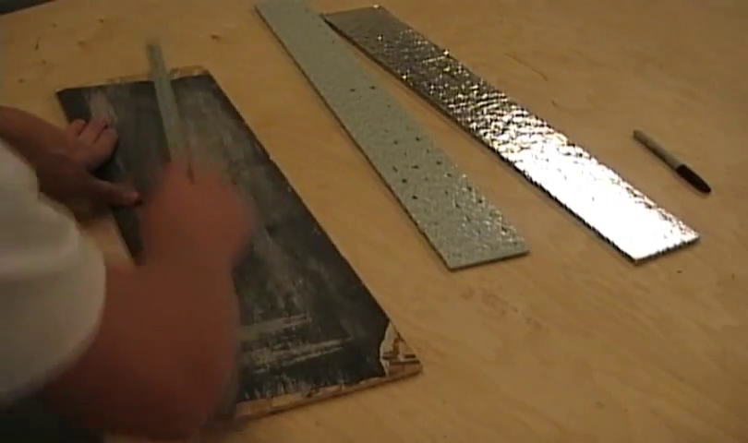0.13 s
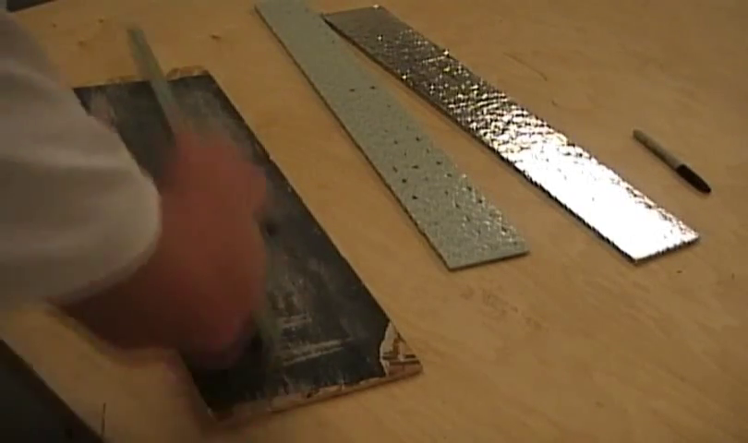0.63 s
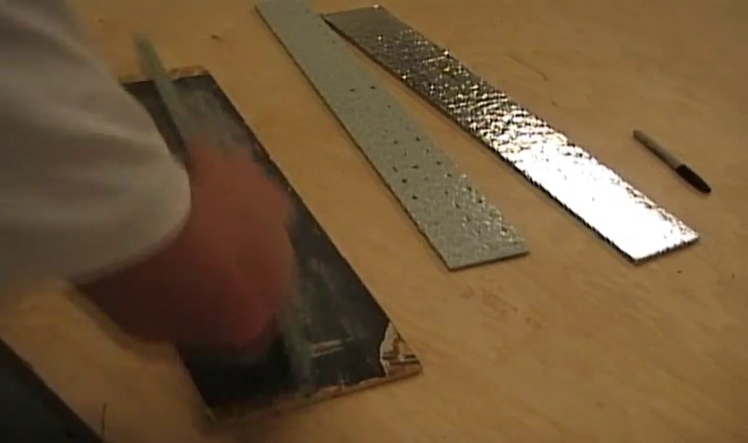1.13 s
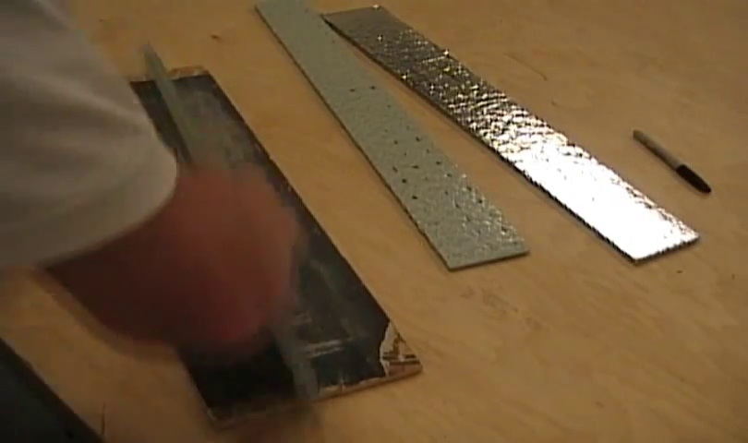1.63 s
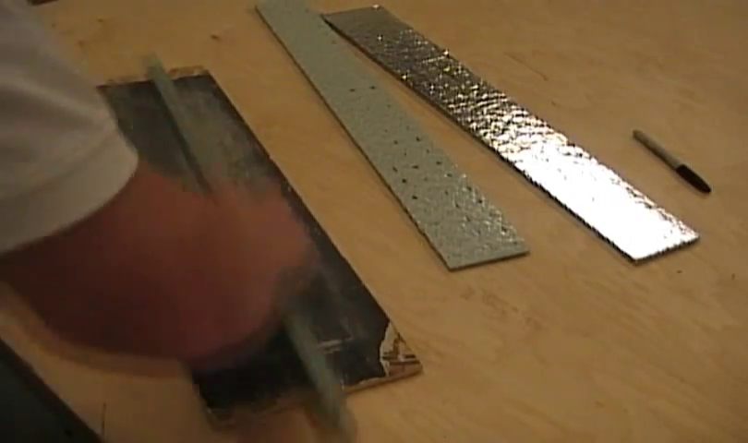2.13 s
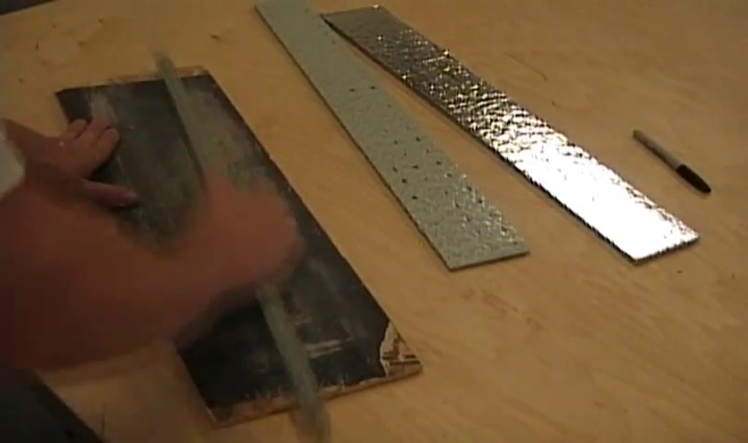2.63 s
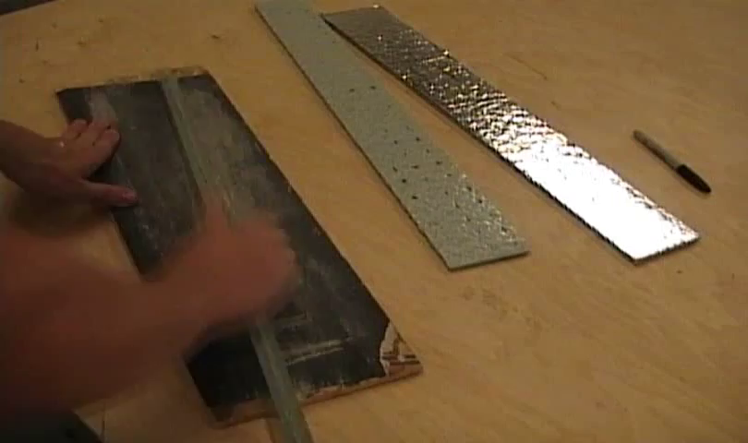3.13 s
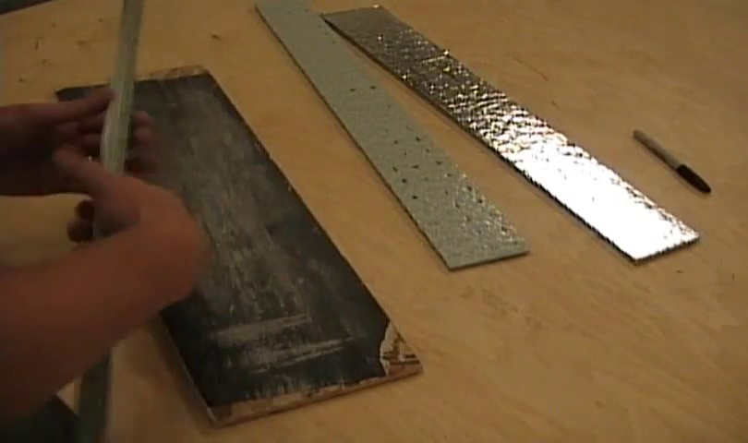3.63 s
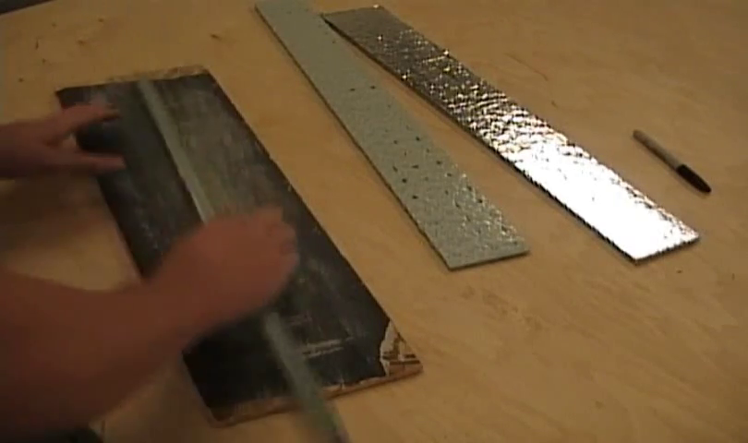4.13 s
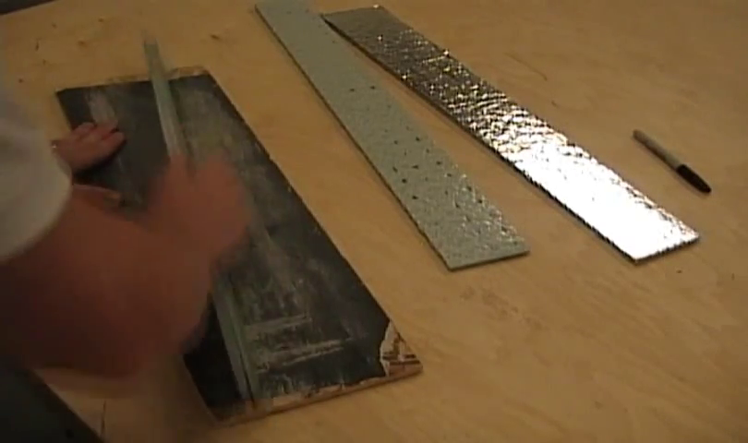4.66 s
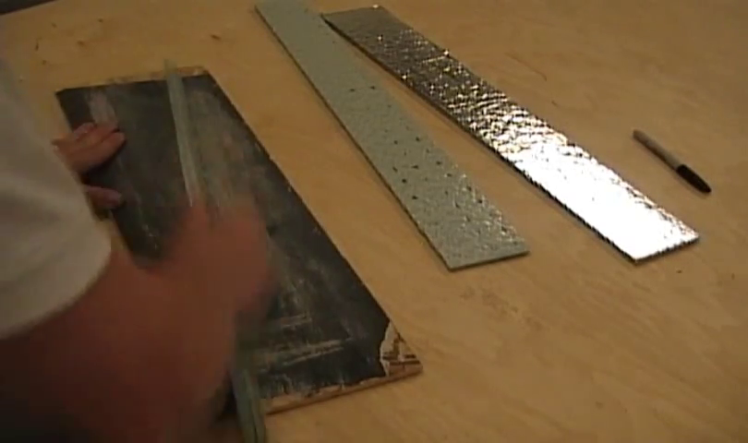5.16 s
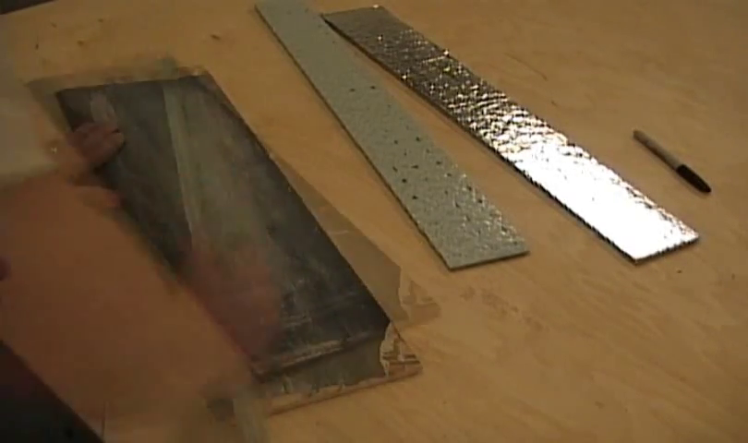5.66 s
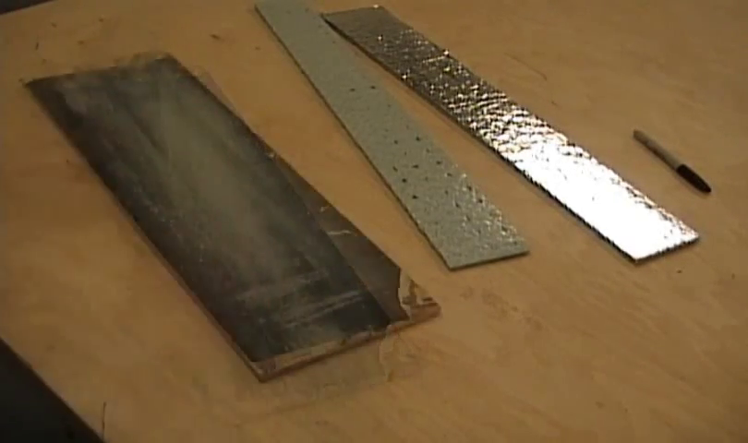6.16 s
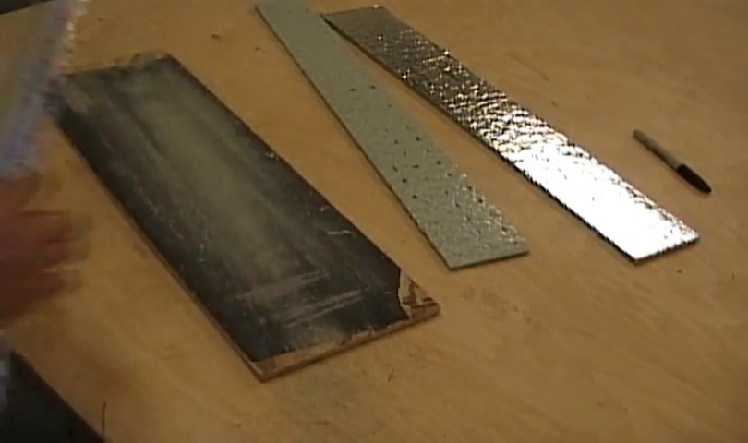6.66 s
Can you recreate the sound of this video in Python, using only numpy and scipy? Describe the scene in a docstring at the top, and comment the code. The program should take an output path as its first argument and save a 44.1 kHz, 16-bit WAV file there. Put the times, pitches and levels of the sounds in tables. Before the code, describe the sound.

A foam strip is rubbed rapidly back and forth on a gritty board in raspy scrapes, pauses with faint scuffs, then rubs again and fades.

```python
"""A hand brushes a foam strip's edge against gritty board, then rubs it to and fro in thirteen strokes.
It stops, turns the strip with faint scuffs, sets it down with a skip and rubs nine strokes more.
Grit tears the foam in dense noise ticks that follow the speed; touches are short decaying bursts.
Room air, hum, fan tones and a whine lie under it all; near the end strokes fade and fan tones come up.
A camcorder rides its gain slowly and notches out the multiples of its tape drum."""
import sys
import numpy as np
from scipy import signal
from scipy.fft import rfft, irfft, next_fast_len
from scipy.io import wavfile
from scipy.ndimage import uniform_filter1d

SR = 44100
rng = np.random.default_rng(int(sys.argv[2]) if len(sys.argv) > 2 else 0)


def bounce(signal):
    """Save signal as a 16-bit WAV file at the path given by the first command-line argument."""
    frames = np.transpose(np.atleast_2d(signal))
    limited = np.clip(frames, -1, 1)
    pcm = np.round(limited * 32767).astype(np.int16)
    wavfile.write(sys.argv[1], SR, pcm)


def to_linear_factor(level_db):
    """Convert decibel levels (scalar or array-like) to linear amplitude factors."""
    exponent = np.asarray(level_db, float) / 20
    return 10 ** exponent


N = 299130
SIZE = next_fast_len(N + SR)  # transform length, with space for the echoes
HZ = np.arange(SIZE // 2 + 1) * SR / SIZE
T = np.arange(N) / SR
BANDS = 250 * 2 ** np.arange(0, 6.1, .5)  # half-octave centres [Hz]

# Spectrum of grit tearing foam: (frequency [Hz], relative density [dB per Hz])
GRIT_SPECTRUM = [(150, -26), (250, -18.5), (440, -12.5), (513, -11), (599, -10), (788, -5), (888, -6),
                 (1410, -2), (2020, -2.5), (4440, 1), (7960, 0.5), (12200, -7.5), (14000, -15),
                 (15000, -18)]


def along(table, hz=HZ):
    """Logarithmic frequency scale: interpolates (Hz, value) points along it."""
    f, value = np.transpose(table)
    return np.interp(np.log(hz + 1), np.log(f), value)


def shape(x, gain):
    """Linear filtering: multiplies the spectrum by a gain for each frequency."""
    return irfft(rfft(x, SIZE) * gain, SIZE)[..., :N]


def level(x, db):
    """Root-mean-square level: scales the signal to it."""
    return x * to_linear_factor(db) / np.sqrt(np.mean(x ** 2))


def walk(rate):
    """Slow random modulation: normal values held 1 / rate seconds and smoothed twice."""
    hold = int(SR / rate)
    held = np.repeat(rng.standard_normal(N // hold + 1), hold)
    return uniform_filter1d(uniform_filter1d(held, hold), hold)[:N]


def band(k):
    """Complementary filter bank: half-octave gains that add up to one, with open ends."""
    place = np.clip(2 * np.log2((HZ + 1) / BANDS[0]), 0, len(BANDS) - 1)
    return np.cos(np.pi / 2 * np.clip(place - k, -1, 1)) ** 2


def resonance(hz, width):
    """Resonance curve: a peak at hz that halves at width / 2 to either side."""
    return 1 / (1 + (2 * (HZ - hz) / width) ** 2)


def ticks(spread_db, size):
    """Impulsive noise: each tick has its own random size, a few well above the rest."""
    tick_db = spread_db * np.minimum(rng.exponential(size=size), 5)
    return level(rng.standard_normal(size) * to_linear_factor(tick_db), 0)


def strokes():
    """Reciprocating motion: speed, level [dB], direction (pull 1, push -1), progress -0.5 to 0.5."""
    # Strokes, push and pull in turn: (start [s], length [s], mid-stroke level [dB], middle-to-end rise [dB])
    stroke_rows = [(.119, .29, -22.5, 2), (.399, .27, -19.5, 0.5), (.667, .23, -17.5, -1.5),
                   (.896, .25, -15.5, 1.5), (1.144, 0.23, -15.5, -1), (1.371, 0.25, -15, -2),
                   (1.618, 0.24, -15.5, -3.5), (1.853, .26, -14, -1.5), (2.103, .24, -12.5, -1),
                   (2.337, 0.26, -15, -5.5), (2.585, .24, -15, -1), (2.819, .24, -15, -0.5),
                   (3.055, 0.26, -15.5, -4.5), (4.403, .28, -22.5, -2.3), (4.664, 0.25, -21, 1.5),
                   (4.897, .25, -18, -2.5), (5.134, 0.23, -17.5, 0), (5.362, 0.26, -18, -5),
                   (5.594, .22, -20, 2.2), (5.819, .26, -22, -7), (6.072, .23, -29.5, -2.5),
                   (6.315, .14, -40.5, -4)]
    speed, db, way, part = np.zeros(N), np.full(N, -90.), np.zeros(N), np.zeros(N)
    for k, (start, length, middle_db, lean_db) in enumerate(stroke_rows):
        u = (T - start) / length
        on = (u >= 0) & (u < 1)
        speed[on] = np.tanh(1.168 * np.sin(np.pi * u[on] ** 0.97))  # the arm holds its pace mid-stroke
        part[on] = u[on] - .5
        db[on] = middle_db + 2 * lean_db * part[on]
        way[on] = -(-1) ** k
    return speed, db, way, part


def sanding():
    """Friction noise: power laws of speed keep the board sounding through turns as the fizz dies."""
    # Colour of the scrape over the bouts: (time [s], board gain [dB], fizz gain [dB])
    colour_rows = [(.25, 1, 5.5), (.8, -1, 0), (1.5, -3.5, .5), (2.1, -3.5, -1), (2.6, -3.2, 4.2),
                   (3.3, 0.2, 3), (4.48, 1.5, 9.5), (4.65, -3, 6.5), (5.0, -3, 4), (5.9, -2.6, 4),
                   (6.4, -4, 5)]
    # Resonances of the board: (frequency [Hz], width [Hz], gain above the grit [dB])
    board_modes = [(540, 67, 3.5), (1490, 150, 1), (5060, 900, 1.5), (6300, 1150, -1), (8000, 390, 1)]
    speed, db, way, part = strokes()
    s, low_db, high_db = np.transpose(colour_rows)
    board_db = np.interp(T, s, low_db) + 1.15 * way  # a pull brings out the board
    fizz_db = np.interp(T, s, high_db) - 0.4 * way - 1.2 * part
    colour = to_linear_factor(along(GRIT_SPECTRUM))
    for hz, width, gain_db in board_modes:
        colour = colour * to_linear_factor(gain_db * resonance(hz, width))
    grains = rfft(ticks(2.46, (2, N)), SIZE) * colour
    grains /= np.sqrt(np.mean(irfft(grains, SIZE)[:, :N] ** 2))
    press_db = walk(30)
    out = 0
    for k, hz in enumerate(BANDS):
        low = np.clip(np.log2(2800 / hz), 0, 1)
        high = np.clip(np.log2(hz / 5000), 0, 1)
        patch_db = 1.5 * walk(14)  # worn and fresh grit tear differently
        singing = np.exp(-np.log2(hz / 4800) ** 2 * 4)  # the foam sings most at full speed
        power = 1.4 - 0.31 * low + 0.51 * high + 0.42 * singing
        gain_db = low * board_db + high * fizz_db + patch_db
        out = out + irfft(grains * band(k), SIZE)[:, :N] * (0.068 + speed) ** power * to_linear_factor(gain_db)
    return out * to_linear_factor(db + press_db)


def ring(touch):
    """Driven resonance: touches and rubbing shake a board mode, most as a bout starts and at the near end."""
    mode_hz, width_hz, lingers_s = 786, 60, 0.063
    speed, db, way, part = strokes()
    fresh = sum(np.exp(-np.maximum(T - s, 0) / 0.22) * (T > s) for s in (0.119, 4.403))  # bout starts [s]
    mode = 1 / (1 + 1j * (HZ ** 2 - mode_hz ** 2) / (HZ + 1) / width_hz)
    near_end_db = 5 * 2 * way * part  # 5 dB up at the near end, 5 dB down at the far end
    drive_db = db - 32.5 + 14.5 * fresh + near_end_db
    keep = np.exp(-1 / (lingers_s * SR))
    drive = signal.lfilter([1 - keep], [1, -keep], (0.59 + speed) * to_linear_factor(drive_db))
    waver_db = 5 * walk(8)
    rubbed = rng.standard_normal((2, N)) * drive * to_linear_factor(waver_db) * np.sqrt(SR / np.pi / width_hz)
    return shape(rubbed + to_linear_factor(8.5) * touch, mode)


def touches():
    """Stick-slip contacts: lists each as (time [s], relative level [dB], length [s], centre [Hz], grit 0-1)."""
    # The strip or a nail catches the grit: (time [s], relative level [dB], centre [Hz])
    catches = [(.072, -30, 5940), (0.0802, -27, 6500), (.0875, -29, 8000), (.126, -20, 9150),
               (3.134, -13, 7000), (3.478, -38, 9000), (3.734, -33, 6000), (3.828, -45, 7000),
               (3.914, -36, 12000), (3.953, -37, 10000), (4.142, -35, 9150), (4.302, -22, 9100),
               (4.337, -20, 9400), (4.427, -21, 7000), (6.075, -34, 8000), (6.363, -28, 8700)]
    # The strip is set down: (time [s], relative level [dB], centre [Hz])
    landings = [(4.183, -21.5, 5400), (4.253, -17, 8000)]
    # Skips of each landing, with a longer drag from the first contact: (delay [s], gain [dB], length [s])
    skip_rows = [(0.00071, -1.5, 0.0031), (0.012, 1.5, 0.0028), (.0125, 1, .003), (0, -8.5, 0.014)]
    # Fingers and strip drag lightly: (time [s], relative level [dB], centre [Hz], length [s])
    brushes = [(0.102, -34, 8000, 0.026), (.12, -23, 10000, .012), (3.295, -31, 6100, 0.046),
               (3.539, -37, 11300, 0.024), (3.653, -40.5, 9560, 0.03), (3.676, -37.5, 9800, .073),
               (3.864, -45, 6040, .056), (3.965, -43, 8000, 0.018), (4.018, -43.5, 8900, .12),
               (4.145, -39, 9000, 0.025), (4.23, -25.5, 6000, 0.014), (4.307, -28, 8400, 0.025),
               (4.33, -24, 9000, 0.013), (4.347, -28, 6700, .06), (4.408, -22, 7000, 0.027),
               (4.731, -13.5, 8000, 0.016), (4.937, -14, 6300, 0.015), (6.441, -47, 7040, .09),
               (6.546, -45.5, 9000, 0.042), (6.624, -40, 10500, 0.015), (6.747, -48, 9200, 0.012)]
    # Faint random crackle of handling: (start [s], end [s], highest relative level [dB])
    handling = [(0, 0.069, -42), (3.652, 4.156, -43), (6.4, 6.782, -49)]
    tick_s, tick_grit, brush_grit = 0.0032, 0.74, 0.27
    crackles_per_s = 14
    rows = [(s, db, tick_s, hz, tick_grit) for s, db, hz in catches]
    for s, db, hz in landings:
        rows += [(s + late, db + skip_db, length, hz, tick_grit) for late, skip_db, length in skip_rows]
    rows += [(s, db, length, hz, brush_grit) for s, db, hz, length in brushes]
    for start, end, db in handling:
        count = int(np.ceil(crackles_per_s * (end - start)))
        for when, size, pitch in rng.random((count, 3)):
            rows.append((start + when * (end - start), db - 6 * size, tick_s, 6000 * 2 ** pitch, tick_grit))
    return rows


def scuffs():
    """Transient friction: each touch crackles over the grit and dies away, with one bright zone."""
    out, count = np.zeros((2, N)), 2 ** 14
    hz_axis = np.arange(count // 2 + 1) * SR / count
    light_db = 3.3 * np.log2(1 + hz_axis / 8000)  # a light touch is brighter
    colour = to_linear_factor(along(GRIT_SPECTRUM, hz_axis) + light_db)
    for s, db, length, hz, grit in touches():
        u = np.arange(count) / SR / length
        jumps = np.clip(rng.standard_normal(count // 32), -2.5, 2.5)
        skips = to_linear_factor(8 * grit * (np.repeat(jumps, 32) - grit))
        zone = 0.77 + np.exp(-(np.log((hz_axis + 1) / hz) / 0.3) ** 2)
        force = skips * np.minimum(u * (2.0 + 6 * grit), 1) * np.exp(-u ** 1.18)
        burst = np.roll(ticks(0.84, (2, count)) * force, 32, axis=1)
        touch = irfft(rfft(burst) * colour * zone)
        i = int(s * SR)
        out[:, i:i + count] += to_linear_factor(db - 2.5) * touch[:, :N - i]
    return out


def stereo(mid, side):
    """Two-capsule pickup: left and right differ in level, in phase and by the side signal."""
    # Gain of the side signal: (frequency [Hz], gain [dB])
    side_gain = [(60, -24), (110, -21), (200, -29), (380, -23), (690, -18.5), (1280, -20.5), (2360, -20),
                 (4350, -13.5), (8020, -9.5), (14800, -8)]
    # Balance of the capsules: (frequency [Hz], left minus right [dB])
    balance = [(60, .5), (200, 1), (800, 1.3), (2400, 0.7), (4800, -1), (6500, 0.2), (10000, 5),
               (12500, -1.2)]
    # Phase by which left leads: (frequency [Hz], lead [rad])
    phase_lead = [(3800, 0), (5200, 0.5), (7700, 0.58), (10300, 0.23), (13000, 0.19)]
    tilt = to_linear_factor(along(balance) / 2) * np.exp(.5j * along(phase_lead))
    side = shape(side, to_linear_factor(along(side_gain)))
    return np.array([shape(mid + side, tilt), shape(mid - side, 1 / tilt)])


def room(x):
    """Reverberation: convolves with noise whose bands each decay by 60 dB in their own time."""
    # Reverberation time: (frequency [Hz], time to fall 60 dB [s])
    decay_times = [(300, 1), (2000, 1), (6000, 0.31), (12000, 0.32)]
    t = np.arange(int(0.97 * SR)) / SR
    noise = rfft(rng.standard_normal(len(t)), SIZE)
    tail = 0
    for k, hz in enumerate(BANDS):
        tail = tail + irfft(noise * band(k), SIZE)[:len(t)] * to_linear_factor(-60 * t / along(decay_times, hz))
    tail = tail * (t > .006)  # the first echo comes after 6 ms
    return shape(x, rfft(tail / np.sqrt(np.sum(tail ** 2)), SIZE))


def air():
    """Broadband and tonal background: ventilation rush, mains hum, rough fan tones and a motor whine."""
    # Spectrum of the rush: (frequency [Hz], relative density [dB per Hz])
    rush_spectrum = [(15, -48), (25, -38), (86, -2.5), (121, -4), (278, -3.5), (529, -4), (604, -6.5),
                     (1580, -12), (2180, -15.5), (6900, -23), (13100, -25.5), (15000, -61)]
    # Background level over time, the fan tones coming up at the end:
    # (time [s], gain of the whole background [dB], further gain of the fan tones [dB])
    background_gains = [(0, -1, -3.5), (3.5, -0.5, 1), (5.599, 0, 3), (6.0, 1, -2), (6.3, 4, 4),
                        (6.78, 0.5, 5.5)]
    # Fan tones: (frequency [Hz], width [Hz], level before the background gains [dB])
    fan_tones = [(186, 19, -62.5), (358.5, 27, -61.5)]
    s, air_db, fan_db = np.transpose(background_gains)
    rush = to_linear_factor(along(rush_spectrum))
    mid, side = (level(shape(rng.standard_normal(N), rush), -49.5) for _ in range(2))
    mains = np.sqrt(2) * to_linear_factor(-52.5 + 0.35 * walk(12)) * np.sin(2 * np.pi * 120 * T)
    fan = 0
    for hz, width, db in fan_tones:
        fan = fan + level(shape(rng.standard_normal(N), resonance(hz, width)), db)
    mid = mid + mains + fan * to_linear_factor(np.interp(T, s, fan_db))
    whine = np.sqrt(2) * to_linear_factor(-66) * np.sin(2 * np.pi * 580 * T)
    opposed = np.outer([1, -1], whine)  # opposite phase left and right
    return (stereo(mid, to_linear_factor(7.5) * side) + opposed) * to_linear_factor(np.interp(T, s, air_db))


def scene():
    """Superposition: the rubbing near by, its echoes and the room air add up in left and right."""
    room_db = -13
    touch = scuffs()
    # the long contact line sounds a little different left and right
    mid, side = sanding() + touch + ring(touch)
    near = stereo(mid + to_linear_factor(room_db) * room(mid), side + to_linear_factor(room_db + 9.5) * room(mid))
    return near + air()


def gain_control(x):
    """Automatic gain control: gain sinks slowly under loud sound and creeps back up in quiet."""
    target_db, attack_s, release_s = -24, 0.99, 0.73
    hop = SR // 100
    heard_db = 10 * np.log10(uniform_filter1d(np.mean(x ** 2, axis=0), SR // 4)[::hop])
    gain_db = [8]
    for want_db in np.clip(target_db - heard_db, -1, 9.5):
        slowness_s = attack_s if want_db < gain_db[-1] else release_s
        gain_db.append(gain_db[-1] + (want_db - gain_db[-1]) / 100 / slowness_s)
    return x * to_linear_factor(np.interp(T, np.arange(len(gain_db)) / 100, gain_db))


def drum_comb():
    """Recursive comb filter: subtracts the running average of what repeats at every drum turn."""
    # Depth of the notches: (frequency [Hz], depth 0-1)
    notch_depth = [(150, 0.84), (5000, 1), (9000, 0.66), (12000, 0.3), (14000, 0.2)]
    drum_hz, memory = 149.85, .6
    turn = np.exp(-2j * np.pi * HZ / drum_hz)
    return 1 - np.clip(along(notch_depth), 0, 1) * (1 - memory) * turn / (1 - memory * turn)


def narrow(x):
    """Sum and difference signals: subtracts part of the treble's left-right difference, more in some spells."""
    # Spells in which more of the difference is subtracted: (start [s], length [s])
    spells = [(2.513, 0.16), (2.845, 0.64), (4.445, 0.21), (5.966, 0.34)]
    usual_share, spell_share = 0.75, 0.24  # of the treble difference kept
    on = sum(1. * (T > s) * (T < s + length) for s, length in spells)
    on = uniform_filter1d(on, size=1300)
    side = shape((x[0] - x[1]) / 2, 1 / (1 + (2500 / (HZ + 1)) ** 4))
    return x - np.outer([1, -1], side * (1 - usual_share + (usual_share - spell_share) * on))


def roll_off(x):
    """The treble ends steeply here."""
    return signal.sosfilt(signal.butter(12, 15390, fs=SR, output="sos"), x)


def record(dry):
    """Signal processing in series: gain control, soft saturation, drum comb with a top cut, stereo width."""
    top = 1 / np.sqrt(1 + (HZ / 14000) ** 24)
    soft = np.tanh(gain_control(dry))
    mix = narrow(shape(soft, drum_comb() * top))
    return roll_off(mix)


dry = scene()
out = record(dry)
bounce(out)
```